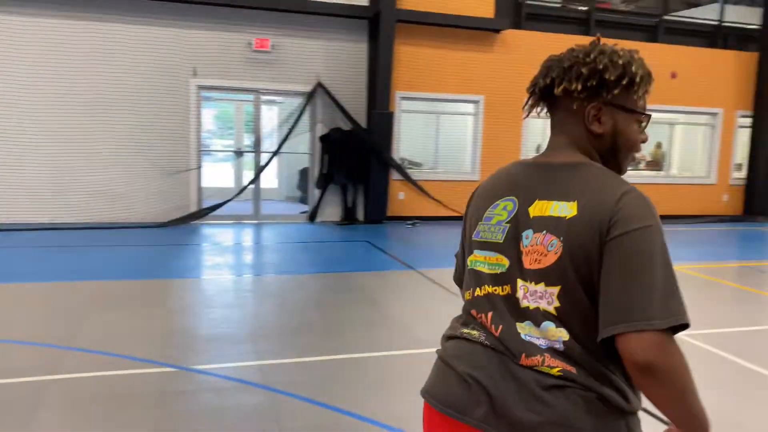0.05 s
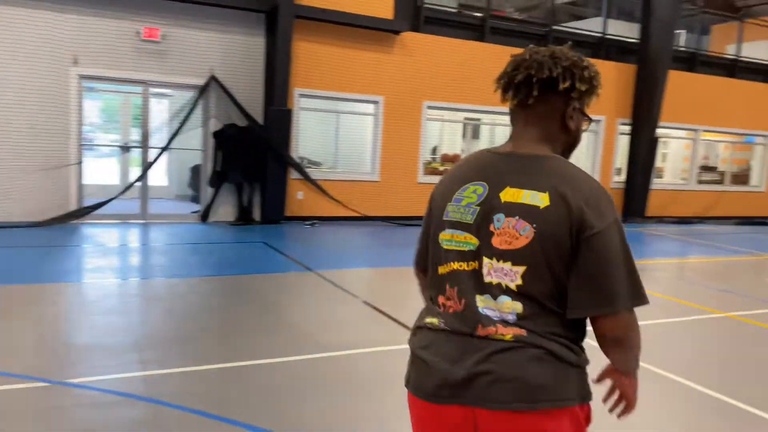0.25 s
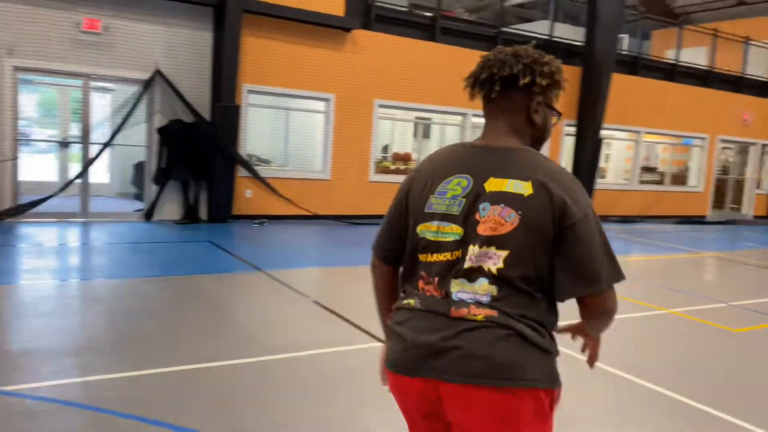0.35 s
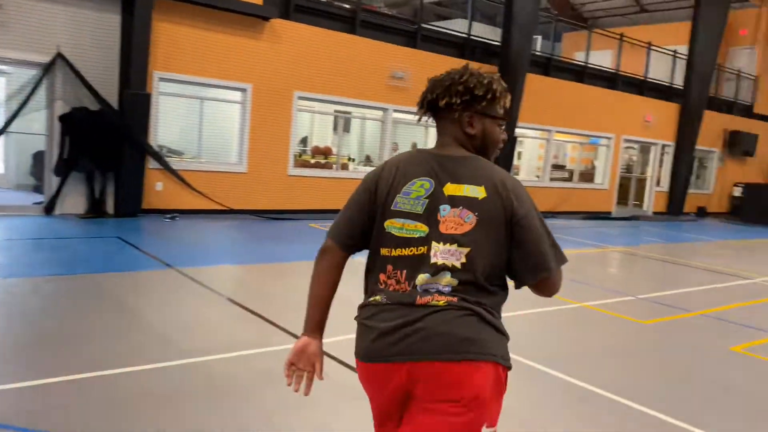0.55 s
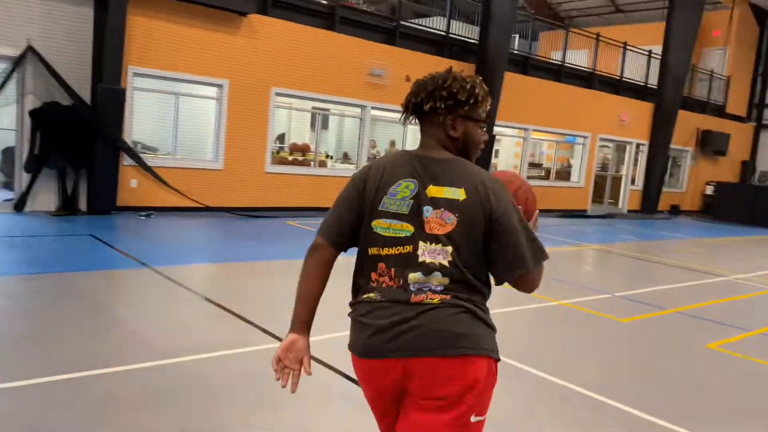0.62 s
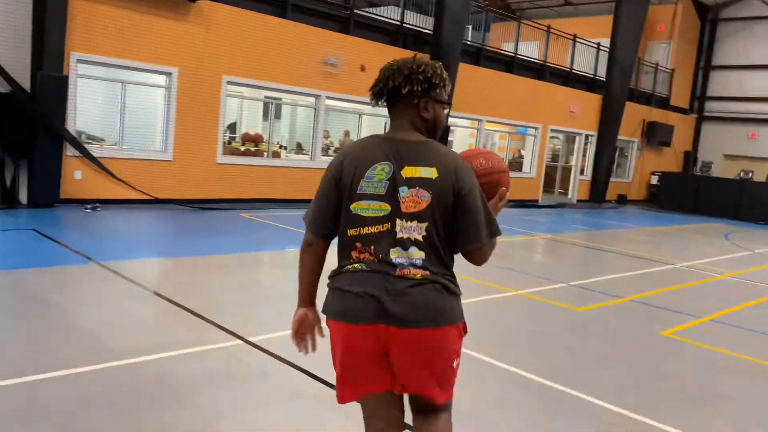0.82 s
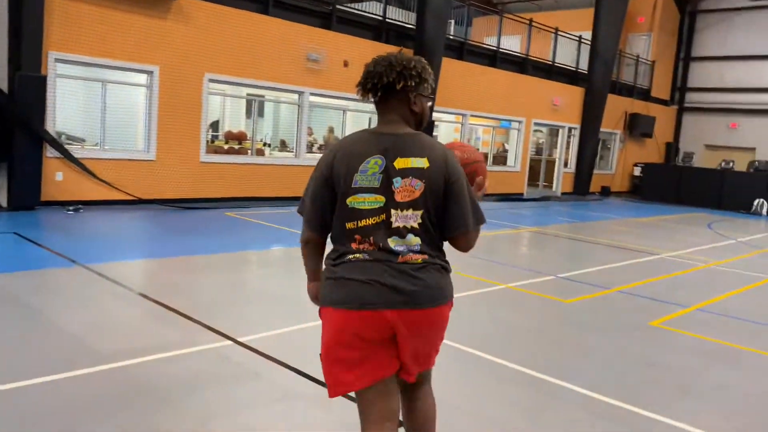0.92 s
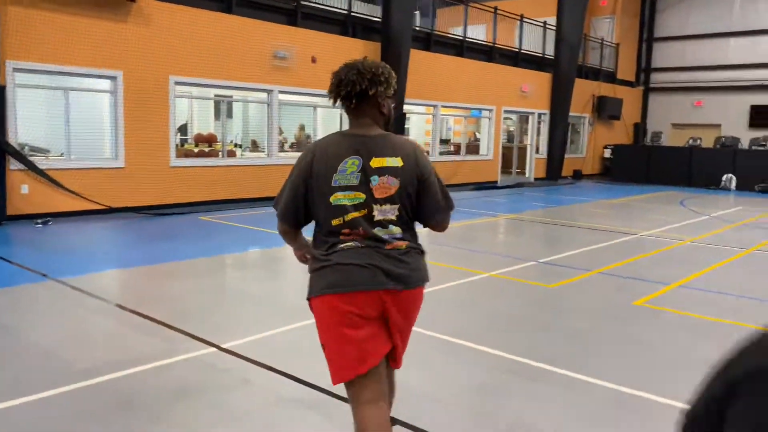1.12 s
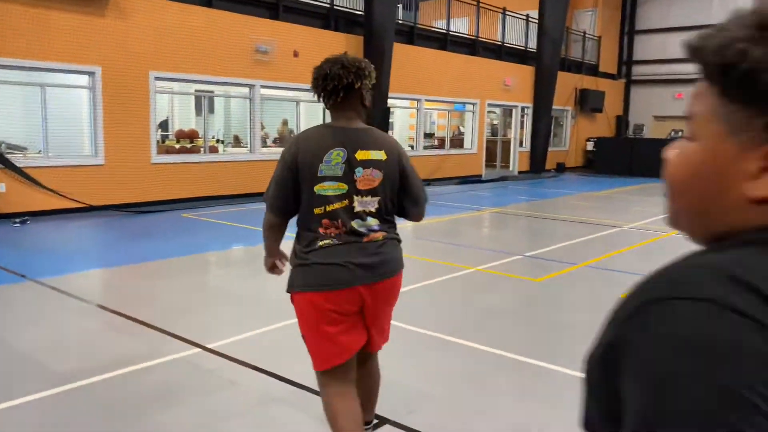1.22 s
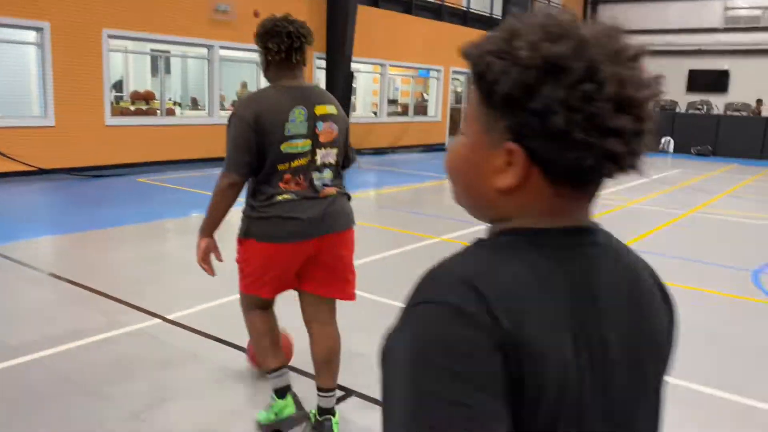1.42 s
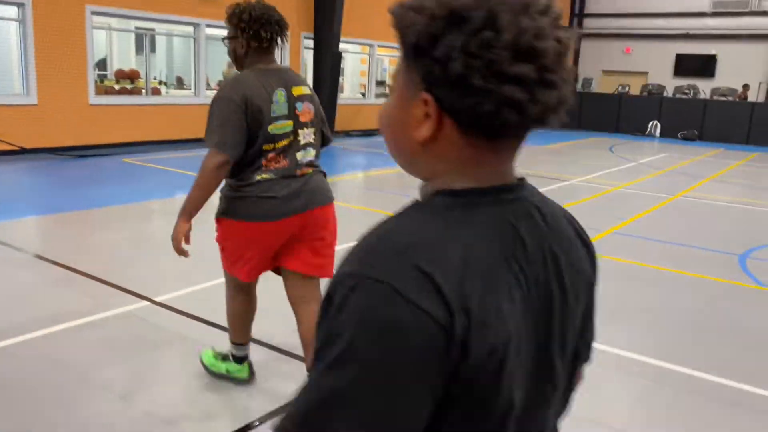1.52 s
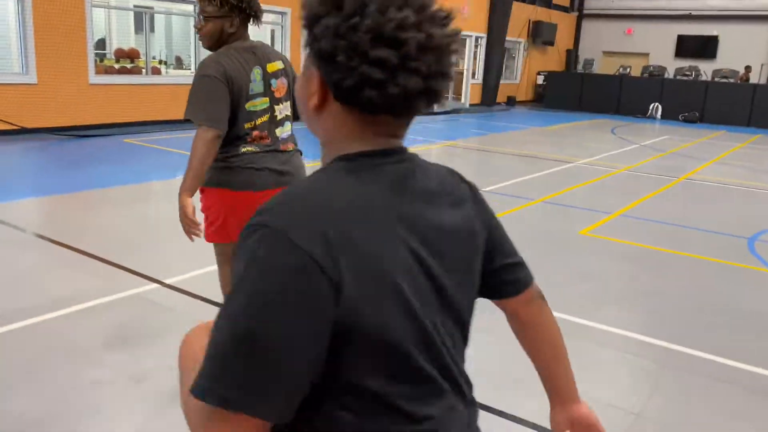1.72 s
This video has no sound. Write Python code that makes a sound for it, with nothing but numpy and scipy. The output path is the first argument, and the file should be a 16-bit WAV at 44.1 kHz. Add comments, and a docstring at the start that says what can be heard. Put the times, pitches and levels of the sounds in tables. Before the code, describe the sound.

In a large, echoing gym, a basketball hits the floor twice near the microphone, each time with a sharp slap and thump. Between the bounces come hand pats on the ball, light footsteps and a faint low boom.

```python
"""Air noise in a large gym, then a basketball bounced twice on the hard floor, close by.
Each bounce: the skin slaps, the shell knocks, the ball squashes with a falling thump, its air pings.
A wall throws it back and the hall rings on. In between, hands catch the ball, shoes tap,
clothes rustle and a low boom hangs in the room."""
import sys
import numpy as np
from scipy import signal
from scipy.fft import rfft, irfft
from scipy.io import wavfile

SR = 44100
rng = np.random.default_rng(int(sys.argv[2]) if len(sys.argv) > 2 else 0)


def unload_audio(sound):
    """Save the sound as a 16-bit wav file, at the path given as the first command line argument."""
    columns = np.transpose(np.atleast_2d(sound))
    # keep every value between -1 and 1, then stretch to whole-number steps
    steps = np.round(np.clip(columns, -1, 1) * 32767)
    wavfile.write(sys.argv[1], SR, steps.astype(np.int16))


N = 77175
TIME_S, FREQ_HZ = np.arange(N) / SR, np.fft.rfftfreq(2 * N, 1 / SR)

# Noise spectra, shape only: (frequency [Hz], level [dB])
AIR_SPECTRUM = [(20, -20), (42, -44), (58, 7.5), (100, -6.5), (200, -5.5), (280, -16), (500, -18.5),
                (1500, -24), (4500, -25.5), (5700, -40.5), (7200, -38), (11000, -45), (13300, -56),
                (16000, -86)]
RUMBLE_SPECTRUM = [(30, -9), (70, 12), (170, -9), (260, -4), (450, -19), (1500, -31.5), (4000, -65)]
RUSTLE_SPECTRUM = [(1500, 9), (4000, 6.5), (5600, 4), (7000, 2.5), (8700, 9.5), (10500, 5), (12200, -1.5),
                   (13300, 11), (16000, -8)]
HISS_SPECTRUM = [(12500, -50), (14200, -43), (14900, 5), (15300, 2), (15700, 1), (16300, -42)]
SCUFF_SPECTRUM = [(100, -16), (200, 0), (380, -1), (600, 6.5), (1000, 1), (1800, 2), (2700, 1), (4500, 3.5),
                  (6000, -13.5), (12000, -23)]
# Filter curves: (frequency [Hz], gain [dB])
HALL_EQ = [(40, -9.5), (70, -17.5), (110, -10), (250, -13.5), (600, -16.5), (1300, -1), (2500, -6.5),
           (4400, 0), (5700, -9.5), (7000, -6), (11000, -28), (16000, -5)]
ROUGH_WALL_EQ = [(50, -14), (120, -2.5), (300, 0.5), (700, 0.5), (1500, 0.5), (3000, -21), (8000, 3),
                 (16000, -12)]
FLAT_WALL_EQ = [(100, -9), (500, -7.5), (1000, 10), (2000, -5.5), (4800, 11.5), (8000, -1.5), (14000, -1)]
PAT_EQ = [(60, -15), (200, 7), (600, 6.5), (1100, -6), (2500, -4), (4300, -1.5), (6000, -3.5),
          (11000, -11.5), (16000, -34)]
SLAP_EQ = [(150, -5), (500, -22), (900, 9), (1400, -4.5), (2100, -2.5), (3000, -6), (3800, -12),
           (5000, -16), (7500, -16.5), (10000, -21), (13000, -25), (16000, -25)]
LEFT_MIC_EQ = [(60, -3), (110, -14.5), (260, -14.5), (400, -14.5), (700, -7.5), (1300, -11), (2400, -20),
               (4400, -25.5), (7600, -14.5), (8400, 1), (16000, -0.5)]
# Left microphone shift: (frequency [Hz], phase [rad])
LEFT_MIC_PHASE = [(0, -1.6), (600, -3), (2500, -8.5), (4500, -6.5), (8200, -4), (16500, 7)]
# Hall decay: (frequency [Hz], T60 [s])
HALL_DECAY = [(60, 0.5), (250, 3.75), (1000, 1.57), (4000, 1.7), (8000, 1.4), (16000, 0.29)]
# Scattered wall echoes: (delay after the first [s], relative level [dB])
ROUGH_ECHOES = [(0, -17), (.007, -26), (0.0149, -21.5), (0.029, -34)]
# Crisp echoes, a row per bounce: (delay [s], gap to second [s], first gain [dB], second gain [dB])
FLAT_ECHOES = [(.049, .0158, -21, -21), (.0418, .027, -11.5, -19)]
# Boom envelope: (time [s], level [dB])
BOOM_ENVELOPE = [(1.08, -67), (1.125, -33), (1.165, -27), (1.26, -28), (1.34, -30.5), (1.41, -35),
                 (1.5, -36.5), (1.75, -45.5)]
# Cloth envelopes: (time [s], relative rustle [dB], relative hiss [dB])
CLOTH_ENVELOPE = [(0, -71, -71), (.19, -84, -58), (.4, -60.5, -76), (.55, -79, -78), (0.592, -45.5, -56),
                  (.65, -61, -71), (.69, -44, -41), (.74, -58, -52), (.87, -51.5, -48.5),
                  (0.982, -54.5, -52), (1.04, -126.5, -65), (1.245, -83, -82), (1.274, -63, -61),
                  (1.36, -67, -53), (1.46, -60, -45), (1.54, -59, -52), (1.6, -57.5, -66), (1.75, -62, -53)]
# Cloth swishes: (time [s], width [s], relative rustle [dB], relative hiss [dB])
CLOTH_SWISHES = [(1.346, 0.0039, -48, -66), (1.383, 0.0069, -54.5, -30.5), (1.55, 0.013, -55.5, -43)]
# Palms and soles rubbing: (time [s], width [s], level [dB], tilt [dB/oct])
SCUFF_EVENTS = [(0.605, 0.021, -41.5, -5.5), (0.656, 0.015, -41, 4.5), (0.703, 0.0085, -33.5, -6),
                (.745, 0.042, -47.5, -2), (.899, 0.0017, -36.5, -6), (1.125, 0.0028, -39.5, -3),
                (1.17, 0.059, -48, -2), (1.33, 0.082, -52, 0.5), (1.69, 0.029, -39, -5)]
# Shoe taps: (time [s], frequency [Hz], level [dB])
SHOE_TAPS = [(.558, 640, -25), (.917, 580, -25), (1.075, 675, -28.5), (1.284, 510, -32)]
# Soft thuds: (time [s], frequency [Hz], level [dB], rise [s])
LOW_THUDS = [(.285, 119, -20, 0.0118), (0.559, 80, -28.5, 0.009), (.575, 236, -37, 0.034),
             (0.669, 215.7, -31, 0.017), (0.736, 181, -33.5, 0.028), (1.085, 197, -35.5, 0.029),
             (1.539, 194, -24, 0.0085), (1.601, 65.3, -25.5, 0.046)]
# Hands on the ball: (time [s], relative level [dB], tilt [dB/oct], decay [s])
HAND_PATS = [(0.567, -1, -.5, 0.0035), (.586, -3, -1, 0.0024), (0.6676, 4, -1, 0.0019)]
# Air inside the ball: (frequency [Hz], relative level [dB], T60 [s])
CAVITY_MODES = [(988, 23, 0.1), (1040, 26, 0.29), (1200, -51, 0.29), (1570, 17, 0.6), (2035, -2, 0.22),
                (2450, 15, 0.45), (3000, -5, .3)]
# Shell and floor: (frequency [Hz], relative level [dB], rise [s], shape [-], share of knock gain [-])
KNOCK_MODES = [(274.3, -7, 0.0083, 5.26, 0.44), (399, -20, 0.0024, 1.56, -1.14),
               (627, -4, 0.003, 2.9, 0.97), (804, -15.5, 0.0094, 17, 0.53), (1260, -26.5, 0.012, 12, 0.74)]
# Bounces: (time [s], gain [dB], knock gain [dB], slap tilt [dB/oct], smack [Hz], smack gain [dB],
# hall gain [dB])
BALL_BOUNCES = [(.2240, 0.5, -3.5, -1, 2100, -13.5, 0.5), (1.4286, -1.5, -7.5, 0.5, 1336, -11.5, 4)]


def amp(db):
    """Decibels to gain."""
    return 10 ** (np.asarray(db) / 20)


def curve(points, hz=FREQ_HZ):
    """Table interpolated over log frequency."""
    point_hz, value = np.transpose(points)
    return np.interp(np.log(hz + 1), np.log(point_hz + 1), value)


def tilt(db_per_oct):
    """Slope in dB about 2 kHz, flat outside 0.4-10 kHz."""
    return db_per_oct * np.log2(np.clip(FREQ_HZ, 400, 10000) / 2000)


def add(mix, at_s, sound):
    """Mix in place."""
    part = mix[max(round(at_s * SR), 0):][:len(sound)]
    part += sound[:len(part)]


def colour(x, gain_db):
    """Minimum-phase filter."""
    log_gain = np.log(amp(np.maximum(gain_db, -100)))
    mirrored = np.r_[log_gain, log_gain[-2:0:-1]]
    response = np.exp(np.conj(signal.hilbert(mirrored)))[:N + 1]
    return irfft(rfft(x, 2 * N) * response)[..., :N]


def convolve(x, impulses):
    """Mono through a two-channel impulse response."""
    return signal.fftconvolve(x[None], impulses, axes=1)[:, :N]


def noise(spectrum_db):
    """Steady shaped noise, rms 1."""
    x = irfft(rfft(rng.standard_normal(2 * N)) * amp(spectrum_db))[:N]
    return x / np.sqrt(np.mean(x ** 2) + 1e-20)


def wobble(corner_hz, order=2):
    """Slow random modulation, rms 1."""
    return noise(-10 * order * np.log10(1 + (FREQ_HZ / corner_hz) ** 2))


def bell(at_s, width_s):
    """Gaussian envelope."""
    return np.exp(-0.5 * ((TIME_S - at_s) / width_s) ** 2)


def swell(rise_s, shape):
    """Envelope peaking at 1 at rise_s; a higher shape is narrower."""
    u = TIME_S / rise_s + 1e-9
    return np.exp(shape * (np.log(u) + 1 - u))


def ring(hz, rise_s, shape):
    """Heavily damped vibration."""
    return swell(rise_s, shape) * np.sin(2 * np.pi * hz * TIME_S)


def stereo(a, b, spread=0.55):
    """Partly correlated channels from two unrelated signals."""
    return np.array([np.sqrt(1 - spread) * a + np.sqrt(spread) * b, a])


def room_air():
    """Steady air noise, mostly low."""
    return amp(-40.5) * stereo(noise(curve(AIR_SPECTRUM)), noise(curve(AIR_SPECTRUM)))


def hall(x, delay_s=0.037, rise_s=0.004, flutter_db=2.1):
    """Late tail: each band dies at its own rate, and the sound arrives in uneven waves."""
    hz, time_s, bands = signal.stft(rng.standard_normal((2, N)), SR, nperseg=256)
    t60_s = curve(HALL_DECAY, hz)[:, None]
    unit_energy = np.sqrt(2 * np.log(1000) / t60_s / SR)
    tail = signal.istft(bands * amp(-60 * time_s / t60_s) * unit_energy, SR, nperseg=256)[1][:, :N]
    onset = 1 - np.exp(-np.maximum(TIME_S - delay_s, 0) / rise_s)
    flutter = amp(flutter_db * wobble(corner_hz=45))
    return stereo(*convolve(colour(x, curve(HALL_EQ)), tail * onset * flutter))


def wall_echoes(x, gap_s, first_db, second_db, scatter_db=-13, scatter_s=0.0017):
    """Two crisp echoes off flat walls in a cluster smeared by rough surfaces."""
    impulses, flat = np.zeros((2, N)), np.zeros(N)
    for side in impulses:
        for delay_s, db in ROUGH_ECHOES:
            add(side, delay_s, amp(db + scatter_db) * rng.standard_normal(N) * np.exp(-TIME_S / scatter_s))
    add(flat, 0, amp(first_db) * x)
    add(flat, gap_s, amp(second_db) * x)
    smeared = colour(stereo(*convolve(x, impulses)), curve(ROUGH_WALL_EQ))
    return smeared + colour(flat, curve(FLAT_WALL_EQ))


def near_scatter(x, decay_s=0.013):
    """Faint reflections off floor and players, ahead of the wall echo."""
    impulses = amp(-36) * rng.standard_normal((2, N)) * np.exp(-TIME_S / decay_s)
    return colour(convolve(x, impulses), tilt(-0.5))


def boom(hz=96.4, waver_depth=0.26):
    """Low wavering note hanging in the hall, with rumble round it."""
    waver = 1 + waver_depth * wobble(corner_hz=25, order=4)
    note = np.sqrt(2) * np.sin(2 * np.pi * hz * TIME_S) * waver
    rumble = amp(-5) * noise(curve(RUMBLE_SPECTRUM))
    return amp(np.interp(TIME_S, *np.transpose(BOOM_ENVELOPE))) * (note + rumble)


def clothes(grain_db=2.1):
    """Grainy cloth rustle with a thin hiss on top."""
    time_s, rustle_db, hiss_db = np.transpose(CLOTH_ENVELOPE)
    rustle_gain = amp(np.interp(TIME_S, time_s, rustle_db))
    hiss_gain = amp(np.interp(TIME_S, time_s, hiss_db))
    for at_s, width_s, swish_db, swish_hiss_db in CLOTH_SWISHES:
        rustle_gain += amp(swish_db) * bell(at_s, width_s)
        hiss_gain += amp(swish_hiss_db) * bell(at_s, width_s)
    grain = amp(grain_db * wobble(corner_hz=90))
    hiss = hiss_gain * noise(curve(HISS_SPECTRUM))
    rustle = amp(6) * rustle_gain * noise(curve(RUSTLE_SPECTRUM))
    return grain * (rustle + hiss)


def scuffs():
    """Palms and soles slide briefly."""
    return sum(amp(db) * bell(at_s, width_s) * noise(curve(SCUFF_SPECTRUM) + tilt(db_per_oct))
               for at_s, width_s, db, db_per_oct in SCUFF_EVENTS)


def taps_and_thuds():
    """Shoe taps and soft low thuds, some from the patted ball."""
    out = np.zeros(N)
    for at_s, hz, db in SHOE_TAPS:
        add(out, at_s, amp(db) * ring(hz, rise_s=0.0024, shape=3.3))
    for at_s, hz, db, rise_s in LOW_THUDS:
        add(out, at_s, amp(db) * ring(hz, rise_s, shape=2.3))
    return out


def hands(gain_db=-16):
    """Palm and fingers pat the pebbled skin."""
    out = np.zeros(N)
    for at_s, db, db_per_oct, decay_s in HAND_PATS:
        burst = rng.standard_normal(N) * np.exp(-TIME_S / decay_s)
        add(out, at_s, colour(burst, gain_db + db + curve(PAT_EQ) + tilt(db_per_oct)))
    return out


def ping(gain_db=-60):
    """The air inside the ball rings."""
    return sum(amp(gain_db + db - 60 * TIME_S / t60_s) * np.sin(2 * np.pi * hz * TIME_S)
               for hz, db, t60_s in CAVITY_MODES)


def knock(gain_db):
    """Shell and floor give a hollow, damped knock."""
    return sum(amp(db + share * gain_db) * ring(hz, rise_s, shape)
               for hz, db, rise_s, shape, share in KNOCK_MODES)


def thump(start_hz=274.6, end_hz=51, glide_s=0.011):
    """The ball squashes; the pitch falls."""
    hz = end_hz + (start_hz - end_hz) * np.exp(-TIME_S / glide_s)
    return -amp(-5) * swell(rise_s=0.015, shape=5.4) * np.sin(2 * np.pi * np.cumsum(hz) / SR)


def slap(db_per_oct, gain_db=15.5, grit_s=0.0022, rub_at_s=0.014, rub_width_s=0.0013):
    """The skin hits the floor with a gritty double pulse, then rubs it while squashed."""
    grit = amp(-19) * np.exp(-TIME_S / grit_s)
    rub = amp(-33.5) * np.exp(-((TIME_S - rub_at_s) / rub_width_s) ** 2)
    skin = rng.standard_normal(N) * (grit + rub)
    add(skin, at_s=0, sound=[-1])
    add(skin, at_s=0.0015, sound=[-0.7])
    return colour(skin, gain_db + curve(SLAP_EQ) + tilt(db_per_oct))


def scene():
    """Room, ball and player; each bounce's pitched smack is heard mostly close by."""
    out = room_air()
    for bounce, (echo_s, *echo_pair) in zip(BALL_BOUNCES, FLAT_ECHOES):
        at_s, db, knock_db, db_per_oct, smack_hz, smack_db, hall_db = bounce
        ball, smack, delayed = np.zeros((3, N))
        add(ball, at_s, amp(db) * (slap(db_per_oct) + thump() + knock(knock_db) + ping()))
        add(smack, at_s, amp(db + smack_db) * ring(smack_hz, rise_s=0.002, shape=5.1))
        room_send = ball + 0.3 * smack
        add(delayed, echo_s, room_send)
        out += ball + smack + near_scatter(ball)
        out += wall_echoes(delayed, *echo_pair) + amp(hall_db) * hall(room_send)
    pats, taps_thuds = hands(), taps_and_thuds()
    tail = hall(amp(5.5) * pats + amp(-21) * taps_thuds)
    return out + pats + taps_thuds + tail + scuffs() + boom() + clothes()


def record(dry):
    """Left microphone quieter below 8 kHz and out of step; peaks round off; low-pass."""
    phase_rad = np.interp(FREQ_HZ, *np.transpose(LEFT_MIC_PHASE))
    response = amp(curve(LEFT_MIC_EQ)) * np.exp(1j * phase_rad)
    left = irfft(rfft(dry[0], 2 * N) * response)[:N]
    both = np.array([left, dry[1]])
    rounded = both / (1 + both ** 8) ** (1 / 8)
    lowpass = signal.firwin(255, cutoff=16300, window=("kaiser", 9), fs=SR)
    return signal.oaconvolve(rounded, lowpass[None], "same")


dry = scene()
out = record(dry)
unload_audio(out)
```